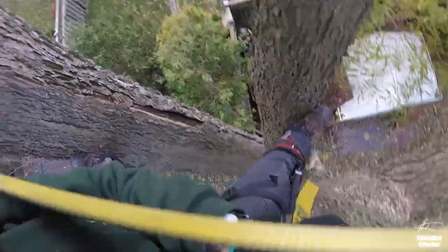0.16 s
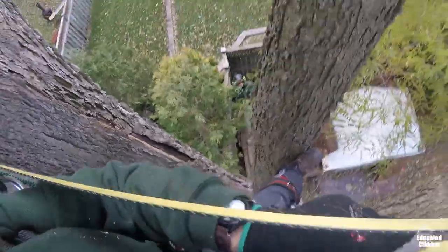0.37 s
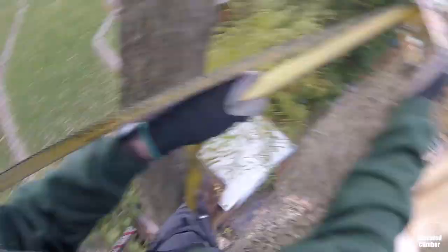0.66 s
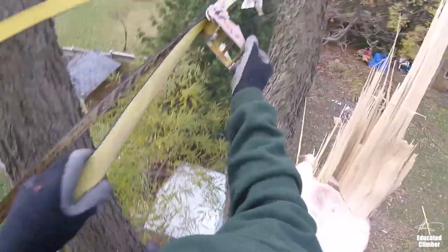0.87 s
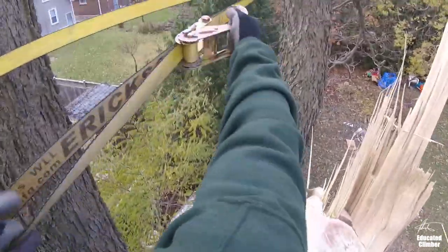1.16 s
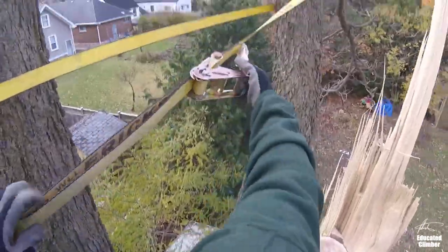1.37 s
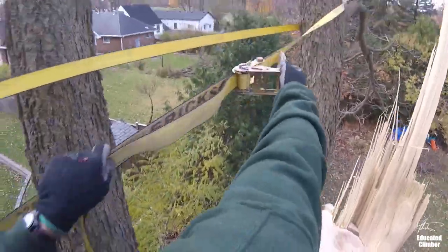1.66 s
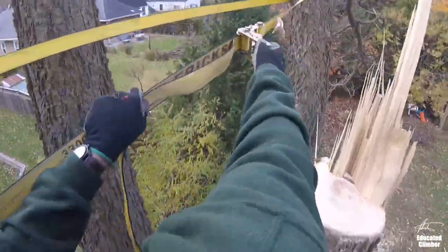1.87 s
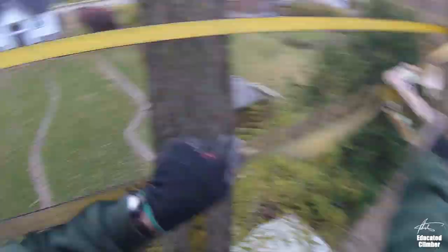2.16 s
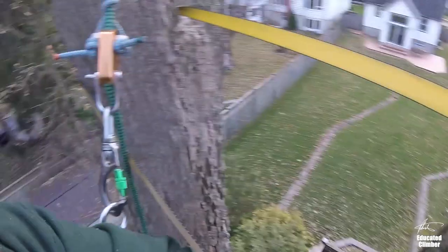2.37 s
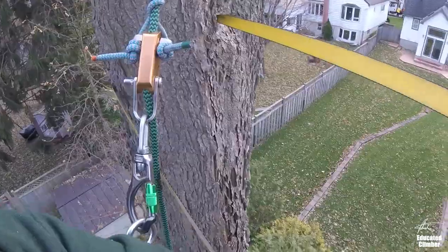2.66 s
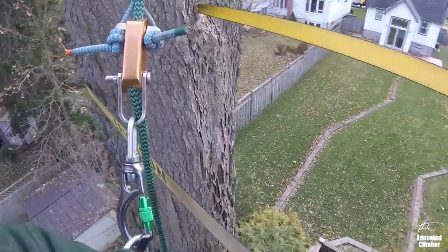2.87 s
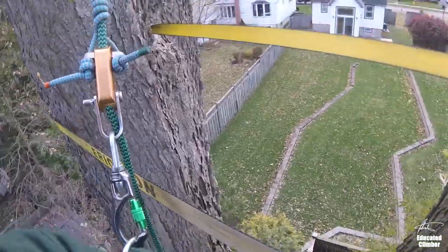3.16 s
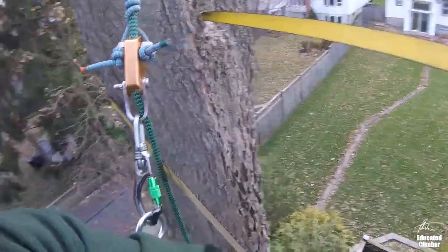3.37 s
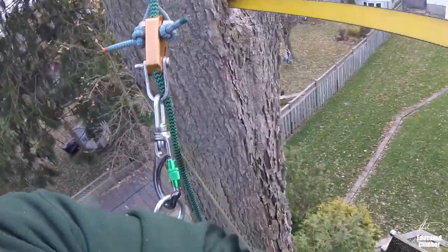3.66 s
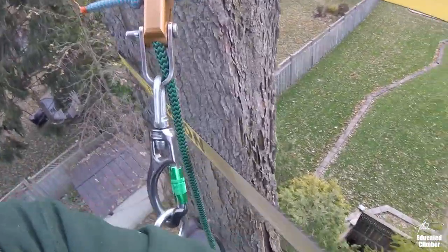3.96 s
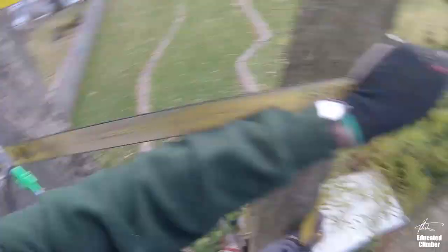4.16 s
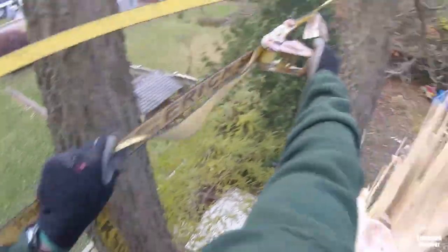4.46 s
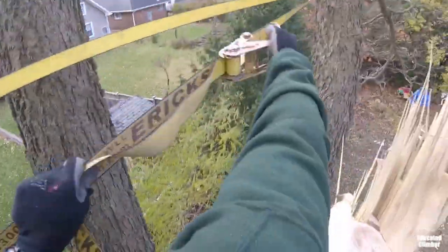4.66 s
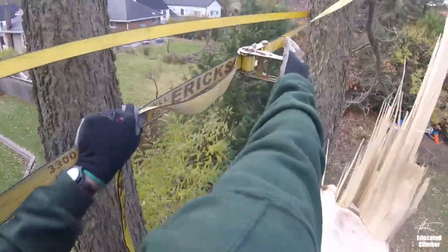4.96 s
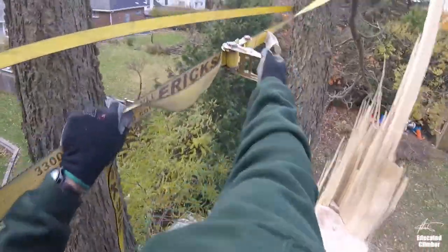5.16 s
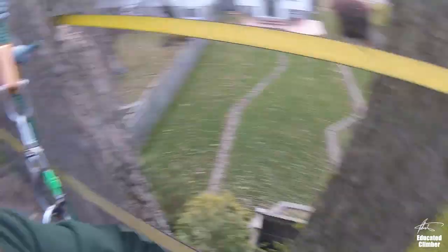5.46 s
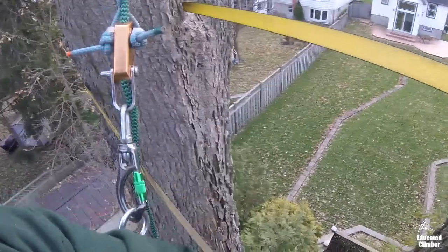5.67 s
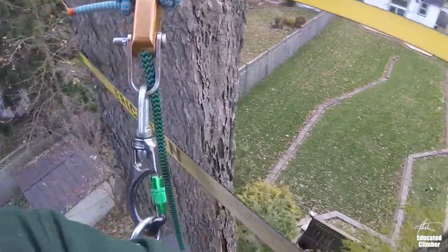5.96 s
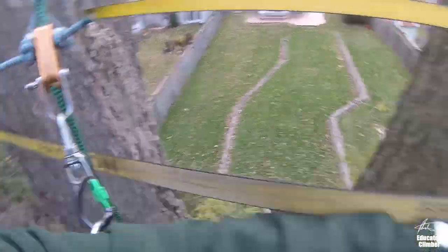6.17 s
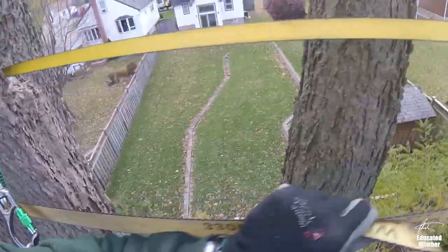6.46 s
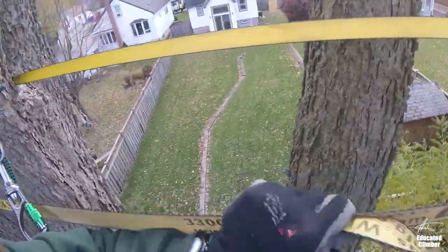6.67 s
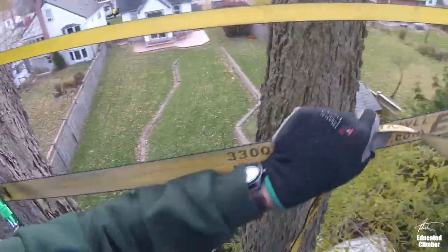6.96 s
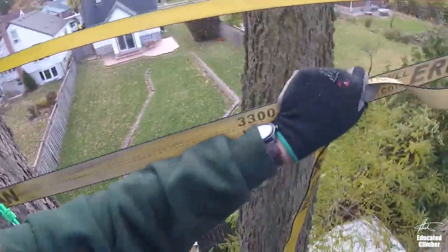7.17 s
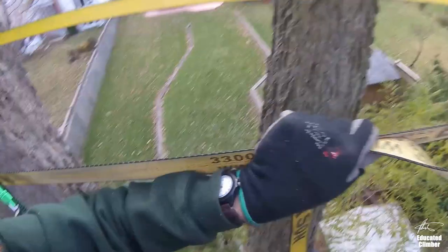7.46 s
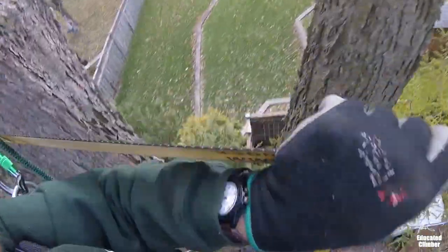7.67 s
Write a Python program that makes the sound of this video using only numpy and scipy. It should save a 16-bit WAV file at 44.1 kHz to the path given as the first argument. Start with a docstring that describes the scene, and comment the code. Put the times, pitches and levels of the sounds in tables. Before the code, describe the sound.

A hand-pumped metal ratchet cracks in singles and quick clusters, tightening a strap outdoors over soft air, hiss and a weak hum.

```python
"""High in a tree a steel ratchet is pumped to tighten a webbing strap between two trunks.
Bursts of tiny slips through dull, bright and steel resonances make the pawl snap and chatter. Edges of
high noise, handle tones, pulses along the taut strap and sliding, rustling noise complete the work.
Banded noise buffets the small camera microphone and gives the air of the suburb, over its steady hiss.
A far motor hums in a few wavering sine orders, and a bird gives a few thin, gliding sine whistles."""
import sys
import numpy as np
from scipy import signal
from scipy.fft import rfft, irfft
from scipy.io import wavfile

SR = 44100
rng = np.random.default_rng(int(sys.argv[2]) if len(sys.argv) > 2 else 0)


def transcribe(signal):
    """Save signal, clipped to [-1, 1], as a 16-bit WAV file at the path in sys.argv[1]."""
    frames = np.atleast_2d(signal).T
    limited = np.clip(frames, -1, 1)
    pcm = np.round(limited * 32767).astype(np.int16)
    wavfile.write(sys.argv[1], SR, pcm)


N = 345303   # length [samples]
GRAIN, LEAD = 4096, 700   # length of one contact, and its start within that [samples]
GRIP_DETUNE = 0.007   # grip and tension shift every tone a little from blow to blow: spread [ratio]

# ringing steel of the ratchet: (frequency [Hz], relative level [dB], t60 [s])
STEEL_MODES = [(1410, -24, .03), (2155, -3, 0.033), (2578, -3.5, 0.024), (3226, -9, 0.039),
               (3826, -2, 0.025), (4760, 1.5, 0.026), (5467, 4.5, 0.011), (6500, 4, 0.017),
               (6987, 2.5, 0.023), (8700, -11, 0.017), (9050, -12, .025), (10170, -20, 0.016),
               (11000, -28.5, 0.015)]
# broad crack of a contact, dull part: (frequency [Hz], width of one pass [Hz], relative level [dB])
DULL_CRACK = [(527, 1700, -12), (1354, 680, -5.5), (2136, 1000, -1.5), (3270, 2030, -1)]
# broad crack of a contact, bright part: (frequency [Hz], width of one pass [Hz], relative level [dB])
BRIGHT_CRACK = [(4932, 1500, 0.5), (6867, 1320, -0.5), (8300, 1900, -10), (9695, 1340, -12.5),
                (12000, 1900, -39), (13500, 700, -41)]


def amp(db):
    """Decibels to gain."""
    return 10 ** (np.asarray(db) / 20)


def rms_one(x):
    """Scale to unit power."""
    return x / np.sqrt(np.mean(np.abs(x) ** 2) + 1e-20)


def in_time(rows):
    """Columns of a curve, one value per sample."""
    s, *columns = np.transpose(rows)
    return [np.interp(np.arange(N) / SR, s, c) for c in columns]


def drift(rate):
    """Random wander of spread 1: noise through two equal poles at rate [Hz], made at SR / 40."""
    r = np.exp(-80 * np.pi * rate / SR)
    noise = rng.standard_normal(N // 40 + 2002)
    slow = signal.lfilter([1], [1, -2 * r, r * r], noise)[2000:]   # drop the settling
    return np.interp(np.arange(N) / 40, np.arange(len(slow)), rms_one(slow))


def resonance(hz, width_hz):
    """Complex response of a two-pole resonance over one grain, 1 at the top."""
    f = np.fft.rfftfreq(GRAIN, 1 / SR)
    return 1j * f * width_hz / (hz ** 2 - f ** 2 + 1j * f * width_hz)


def banded_noise(spectrum, patchy_db, rate):
    """Half-octave bands of noise, each with its own level and flicker; 0 dB per Hz is 1 rms in a kilohertz."""
    out, together = 0, drift(rate / 4)
    limits = 16 * 2 ** np.arange(0, 10.1, .5)
    white = rng.standard_normal((2, N))
    hz, db = np.transpose(spectrum)
    for k, (low, high) in enumerate(zip(limits, limits[1:])):
        if high < hz[0] or low > hz[-1]:
            continue
        band_filter = signal.butter(2, [low, high], "band", fs=SR, output="sos")
        band = signal.sosfilt(band_filter, white[k % 2])   # neighbours use different noise
        level_db = np.interp(np.log(low * high) / 2, np.log(hz), db, right=-90)
        flicker_db = patchy_db * (0.86 * together + drift(rate))
        out = out + band * amp(level_db + flicker_db)
    return out * np.sqrt(SR / 2000)


def wind():
    """Buffeting on the microphone: low banded noise that swells and sinks with the gusts."""
    # gusts: (time [s], relative level [dB])
    gusts = [(0.0, -48.5), (0.8, -51), (0.85, -40.5), (1.42, -67.5), (2.2, -38), (2.36, -37), (2.4, -56),
             (4.03, -50.5), (4.4, -44), (4.67, -61), (4.84, -45.5), (5.12, -52), (5.39, -43.5), (5.49, -57),
             (6.98, -50.5), (7.15, -43), (7.26, -55.5), (7.79, -46), (7.83, -57)]
    # colour of the buffeting: (frequency [Hz], relative density [dB per Hz])
    buffet = [(18, -4), (35, 1.5), (70, -2.5), (120, -10.5), (200, -21), (350, -35.5)]
    gust_db, = in_time(gusts)
    return amp(gust_db + 9.0) * banded_noise(buffet, patchy_db=3.5, rate=15.3)


def distant_air():
    """Air of the suburb: banded noise, weak on top, that shifts slowly."""
    # distant air: (time [s], relative level [dB])
    air_level = [(0.0, -59), (0.91, -58.5), (1.09, -66), (1.7, -64), (1.89, -62.5), (4.03, -59),
                 (4.23, -55.5), (4.84, -62), (7.83, -57.5)]
    # colour of the air: (frequency [Hz], relative density [dB per Hz])
    air_colour = [(30, 5), (90, 7), (250, 6), (500, -1), (900, -3), (2000, -13), (3500, -29), (5000, -39.5)]
    air_db, = in_time(air_level)
    return amp(air_db + 1.5) * banded_noise(air_colour, patchy_db=1.27, rate=1.8)


def hiss():
    """Smooth noise with the colour of the microphone port."""
    # steady hiss, shaped by the port: (frequency [Hz], relative density [dB per Hz])
    port = [(2500, -19.5), (6050, -16.5), (6500, 1), (7000, -7.5), (9500, -12), (10500, -23),
            (12300, -14.5), (13000, -38)]
    hz, db = np.transpose(port)
    even = N + N % 2
    colour = amp(np.interp(np.fft.rfftfreq(even, 1 / SR), hz, db))
    noise = irfft(rfft(rng.standard_normal(even)) * colour)[:N]
    return amp(-70) * rms_one(noise)


def motor():
    """A far motor: a few low orders that waver in pitch and level."""
    # course of the motor: (time [s], frequency of the first order [Hz], level [dB])
    course = [(0, 97.2, -60), (.5, 97.5, -51.5), (1.2, 96.3, -76), (2.6, 96.26, -62.5), (4.2, 96.2, -61),
              (7.83, 95.3, -62.5)]
    # its orders: (multiple, relative level [dB])
    orders = [(1, -2), (2, -4), (3, -14)]
    hz, db = in_time(course)
    phase = 2 * np.pi * np.cumsum(hz * (1 + 0.0059 * drift(2.75))) / SR
    out = 0
    for multiple, order_db in orders:
        level = amp(db + order_db + 2.35 * drift(3.4))
        out = out + np.sqrt(2) * level * np.sin(multiple * phase)
    return out


def rustle(rustle_db):
    """Rustle of webbing and sleeves: banded noise that flickers quickly and follows the work."""
    # colour of the rustle: (frequency [Hz], relative density [dB per Hz])
    cloth = [(220, 4.5), (500, 2), (900, -11.5), (2000, -1), (3500, -6.5), (5000, -4.5), (9000, -6)]
    return amp(rustle_db - 5.5) * banded_noise(cloth, patchy_db=4.5, rate=51.0)


def slip_burst(level_db, fade):
    """Tiny slips in millisecond clumps swell and die away, with a faint swell before and scatter after."""
    slips_per_s, clump_db = 2500, 4   # rate of the larger slips, spread of the clumps
    rise_db = 2   # fade that passes within one time constant of the rise [dB]
    lead_in_db, lead_in_db_per_ms = -22.5, 4
    scatter_db, scatter_ms = -33.5, 69   # relative level; time to fall 10 dB, before the taper
    ms, fade = (np.arange(GRAIN) - LEAD) / SR * 1000, max(fade, .6)
    slips = rng.standard_normal(GRAIN) * (0.69 + 1.53 * (rng.random(GRAIN) < slips_per_s / SR))
    slips *= amp(np.repeat(rng.normal(0, clump_db, GRAIN // 64), repeats=64))
    rise = 1 - np.exp(-np.abs(ms) * fade / rise_db)
    shape = np.where(ms > 0, rise * amp(-fade * ms), 0)
    # a faint noise swells in just before each burst, relatively stronger for louder ones
    swell_db = lead_in_db + 0.24 * (level_db + 14.0) + rng.normal(0, 3.3)
    shape += amp(swell_db - lead_in_db_per_ms * np.abs(ms))
    # the random slips keep the energy of their shape
    burst = slips * shape * np.sqrt(np.sum(shape ** 2) / np.sum((slips * shape) ** 2))
    # sound returned by trunks and branches
    scatter = rng.standard_normal(GRAIN) * amp(scatter_db - 10 * np.abs(ms) / scatter_ms)
    return burst + scatter * (ms > 2) * (1 - ms / ms[-1])


def contact(level_db, fade, dull_db, parts, modes):
    """A burst of slips heard as a broad crack plus the steel modes, struck anew each time."""
    dull_spread_db, bright_spread_db, mode_spread_db = 2.5, 3.5, 4
    ring_db = -2.5   # steel against the crack
    burst = slip_burst(level_db, fade)
    dull_hz, bright_hz, steel_hz = [np.array(t)[:, 0] for t in (DULL_CRACK, BRIGHT_CRACK, STEEL_MODES)]
    # past 6 dB of dullness, the duller the contact the more its weight sinks to the lowest resonances
    knock_db = max(dull_db - 6, 0)
    sink_db = knock_db * np.log2(dull_hz[-1] / np.maximum(dull_hz, dull_hz[1]))
    dull = rms_one(amp(sink_db + rng.normal(0, dull_spread_db, len(dull_hz))) @ parts[0])
    # a light touch is softer and loses the top
    soft_db = 0.63 * (level_db + 19.0) * np.log2(bright_hz / bright_hz[1])
    bright = rms_one(amp(soft_db + rng.normal(0, bright_spread_db, len(bright_hz))) @ parts[1])
    # the low modes follow the dull part
    mode_db = rng.normal(0, mode_spread_db, len(steel_hz)) + dull_db * (steel_hz < 4200)
    steel = amp(mode_db) @ modes
    bins = np.arange(len(steel))
    steel = np.interp(bins * (1 + GRIP_DETUNE * rng.normal()), bins, steel)
    share = amp(dull_db) / np.sqrt(1 + amp(2 * dull_db))
    crack = share * dull + np.sqrt(1 - share ** 2) * bright
    body = crack + amp(ring_db - knock_db) * rms_one(steel)
    return amp(level_db - 2.0) * irfft(rfft(burst) * body)


def ratchet(rustle_db):
    """Clicks on steel with their rebounds, and random faint ticks that follow the rustle of the work."""
    # clicks of pawl, handle and buckle: (time [s], relative level [dB], fade [dB per ms],
    # dull-to-bright balance [dB], rebound above the first touch [dB])
    clicks = [(.0085, -25, 3.5, -7, -17), (0.0526, -35, 2, -1, -16), (0.1467, -11, 1.47, -10, -9),
              (0.205, -25, 1, -4, -19), (0.2102, -11.5, 1.65, -10, -3), (0.3864, -35, 2, -10, -15),
              (0.405, -31.5, 1.5, -1, -15), (0.5213, -33, 2.5, -10, -22), (0.577, -42, 1.5, -2, -14),
              (.632, -42, 5, 1, -12), (0.656, -24, 5, -3, -20), (0.6612, -17.5, 1.5, -1.5, -7),
              (.668, -9, 4, -8, -5.5), (0.696, -31.5, 2.5, 9.5, -12), (0.726, -34, 0, -7, -2),
              (0.7426, -15, 2.5, -5, -22), (.757, -10, 2.5, -7, -29), (0.864, -39.5, 2.5, -3, -19),
              (0.9517, -42.5, 1, -4, -12), (.975, -39.5, 2.5, -2, 2.5), (1.0664, -14, 1.5, -16, -20),
              (1.0704, -9, 2, -19.5, -27), (1.1297, -18.5, 1, -13, 6.5), (1.324, -34, 0.5, -12, -21),
              (1.336, -28, 1.5, -9.5, -15), (1.363, -48.5, 2, 2, -12), (1.7138, -45, 1, -0.5, -2),
              (1.7825, -31.5, 1.5, 11, -15.5), (1.8029, -22.5, 3, 17, -16), (1.8099, -13, 5.5, -8.5, 3),
              (1.866, -31, 6, 6, 1.5), (1.8873, -13, 2.5, -5, -1), (2.0721, -28, 2, -14, -26),
              (2.2125, -36.5, 1, -8, -6), (2.33, -30, 0.5, -5, -21), (2.3356, -10.5, 1.95, -11.5, -11),
              (2.4165, -30, 0.5, -1, -18), (2.4227, -14, 3.5, -11, -3), (2.5851, -43, 0.9, -2, -12),
              (2.889, -30, 8.5, -4.5, -7.5), (2.9767, -29, 3, 9.5, -22), (3.003, -34, 3, -10, -12),
              (3.0113, -20.5, 1, -2.5, -20), (3.0202, -15, 5.5, 2.5, -11.5), (3.0497, -14.5, 17, -4, -22),
              (3.0541, -28.5, 2.5, 16, -8), (3.0885, -32, 3.5, 22, -9), (3.1375, -19, 3, -5, -22),
              (3.19, -46, 5, 3, -17), (3.22, -41, 6, 14, -15), (3.248, -42, 3, 18, -17),
              (3.2606, -35, 1, -1, -19), (3.2651, -21, 3.5, -8, -15), (3.317, -25, 2.5, 2, -13),
              (3.3408, -39, 2.5, 3, -8), (3.3893, -42, 2.5, -4, -11), (3.4156, -42, 2, 5, -12),
              (3.5355, -24.5, 1.5, -4.5, 4), (3.5436, -15.5, 1.7, -6, -8), (3.76, -30.5, 1.2, -1.5, -16),
              (3.979, -44.5, 1.5, -7, -10), (3.9924, -41.5, 3.5, 0, -4), (4.0397, -37.5, 5, 7.5, -13),
              (4.069, -33.5, 3.5, -5, 5), (4.08, -16, 4.5, -5.5, -21), (4.088, -11.5, 2, -5, -9),
              (4.185, -43, 0.5, -7, -12), (4.291, -39.5, 1.5, -8, -8), (4.3278, -16, 2.5, -12, -23),
              (4.378, -26, 1.1, -7, 1.5), (4.4324, -31.5, 9, -9, -11), (4.455, -39.5, 1, -4.5, 4),
              (4.552, -24, 3.5, 12.5, -13), (4.579, -20.5, 1.5, -6, -18), (4.582, -11, 2, -20, -31),
              (4.59, -11.5, 1.5, -12, -6), (4.7724, -32, 0.9, -7.5, -18), (4.7906, -26.5, 3.5, -3.5, -11.5),
              (4.873, -39.5, 2.5, -2, -14), (4.9159, -38, 13, -3.5, 1.5), (5.023, -37.5, 4, -6, 5),
              (5.0402, -18, 2, -9, -22), (5.0503, -10, 3, -9, -34), (5.09, -32, 8, 12, -19),
              (5.1082, -36.5, 1.5, 19, -7), (5.144, -36, 1.5, 11.5, -11), (5.2952, -32, 1.5, -4.5, -22),
              (5.384, -37, 9, -12, -17), (5.404, -44, 2.5, -5, -12), (5.4155, -39, 2.5, -8, -17),
              (5.4364, -36.5, 2.5, 7, -10), (5.53, -20, 4, -3, -22), (5.5322, -10, 3.5, -9, -2.5),
              (5.7369, -25.5, 7, 0, 1), (5.8787, -36.5, 2, 36, -7), (6.059, -30, 2, -12, -17),
              (6.0749, -19.5, 2, -8.5, -22), (6.0876, -13.5, 2.5, -5, -7), (6.156, -36.5, 4.5, 12, -10),
              (6.204, -40.5, 5, -13, -10), (6.3385, -34.5, 2, -2.5, -16), (6.3793, -42, 4, -1, -16),
              (6.4401, -39.5, 7, -6, 1), (6.4643, -36, 2, 14.5, -12), (6.5564, -32.5, 2, -2, -23),
              (6.5685, -20.5, 2, -10, -20), (6.573, -7, 3, -8, -4.5), (6.7867, -36.5, 0, -8, 6.5),
              (6.8047, -27.5, 3.5, -6.5, -27), (6.9055, -42, 1.5, -1, -14), (7.022, -45.5, 1.5, -9, -10),
              (7.111, -36, 8, -10, -5), (7.1267, -12.5, 5.5, 10, -18), (7.137, -24.5, 0, -3, 5),
              (7.1543, -10, 3, -4.5, -12), (7.269, -38, 7, -12, -20), (7.3801, -30.5, 2.2, -3, 3.5),
              (7.7819, -20, 3.5, 9.5, -5)]
    # the pawl lands again: delay [s], fade [dB per ms], change of balance [dB]
    rebound_s, rebound_fade, rebound_dull_db = .0066, 3.2, -3.5
    # faint rattle of loose hardware: rate, base level against the rustle, spread
    ticks_per_s, tick_db, tick_spread_db = 85, 6.5, 3.5
    parts = [np.array([(-1) ** k * amp(db) * resonance(hz, width) ** 2
                       for k, (hz, width, db) in enumerate(part)])
             for part in (DULL_CRACK, BRIGHT_CRACK)]
    modes = np.array([(-1) ** k * amp(db) * np.sqrt(t60) * resonance(hz, np.log(1000) / np.pi / t60)
                      for k, (hz, db, t60) in enumerate(STEEL_MODES)])
    touches = []
    for when, size, fading, tone in rng.random((round(ticks_per_s * N / SR), 4)):
        level_db = rustle_db[int(when * N)] + tick_db - tick_spread_db * np.log(size + .02)
        touches.append((when * N / SR, level_db, 4.0 + 6 * fading, -8 + 16 * tone))
    for s, level_db, fade, dull_db, rebound_db in clicks:
        touches.append((s, level_db, fade, dull_db))
        touches.append((s + rebound_s, level_db + rebound_db, rebound_fade, dull_db + rebound_dull_db))
    out = np.zeros(N + GRAIN)
    for s, level_db, fade, dull_db in touches:
        at = round(s * SR)
        out[at:at + GRAIN] += contact(level_db, fade, dull_db, parts, modes)
    return out[LEAD + 35:LEAD + 35 + N]   # each burst starts 35 samples ahead of its listed time


def high_edges():
    """Brief puffs of very high resonant noise on the hardest snaps."""
    # the hardest snaps carry a thin, very high edge: (time [s], level [dB])
    snaps = [(0.148, -30), (0.6674, -33.5), (1.1343, -36.5), (2.3361, -32.5), (4.578, -43), (5.5306, -30.5),
             (6.573, -25.5)]
    edge_hz, width_hz, fade_ms = 11630, 1300, 4.4   # width of one pass; time to fall 10 dB
    out, ms = np.zeros(N + GRAIN), np.arange(GRAIN) / SR * 1000
    for s, db in snaps:
        puff = irfft(rfft(rng.standard_normal(GRAIN)) * resonance(edge_hz, width_hz) ** 2)
        shape = amp(db - 10 * ms / fade_ms) * np.minimum(ms, 1)
        out[round(s * SR):][:GRAIN] += rms_one(puff) * shape
    return out[:N]


def handle():
    """Blows set the handle ringing: two lingering tones, a little off pitch and unsteady each time."""
    # blows: (time [s], level of the lower tone [dB], level of the upper tone [dB])
    blows = [(0.974, -44.5, -50), (1.072, -48, -38.5), (4.089, -47, -28.5), (4.329, -50, -41),
             (5.052, -30, -37), (6.089, -33.5, -43), (7.026, -68, -53), (7.157, -34.5, -34)]
    # its two tones: (frequency [Hz], t60 [s])
    tones = [(3270, .06), (4730, 0.086)]
    out, t = np.zeros(N + SR), np.arange(SR // 4) / SR
    for s, *levels_db in blows:
        for (hz, t60), db in zip(tones, levels_db):
            turns = hz * (1 + GRIP_DETUNE * rng.normal()) * t
            shape = amp(db - 60 * t / t60) * np.minimum(t / 0.0017, 1)
            out[round(s * SR):][:len(t)] += shape * np.sin(2 * np.pi * turns)
    return out[:N] * amp(4.8 * drift(90.0))


def strap():
    """A pluck runs to and fro along the webbing: a pulse rounder once returned, weaker on every trip."""
    # plucks of the taut strap: (time [s], round trips [Hz], relative level [dB], t60 [s],
    # edge of the first pulse [Hz])
    plucks = [(1.8084, 57.9, -16.5, 0.24, 337), (3.068, 61.5, -25, 0.14, 467),
              (4.552, 61.4, -24.5, 0.047, 1200), (5.878, 59.5, -32.5, 0.043, 1490),
              (7.125, 68.6, -23.5, 0.3, 445)]
    low_cut_hz, trip_loss_hz = 164, 240
    out, near = np.full(N, 1e-18), np.arange(-400, 400)
    for s, hz, db, t60, edge_hz in plucks:
        for trip in range(20):
            rounding = min(trip, 1) / trip_loss_hz ** 2
            width = SR / (2 * np.pi) * np.sqrt(1 / edge_hz ** 2 + rounding)
            pulse = np.exp(-.5 * (near / width) ** 2)
            out[round((s + trip / hz) * SR) + near] += amp(db - 60 * trip / hz / t60) * pulse
    return signal.sosfilt(signal.butter(2, low_cut_hz, "high", fs=SR, output="sos"), out)


def bird():
    """Thin, nearly pure whistles that swell and stop, sliding to a held pitch where they open off it."""
    # bird calls: (time [s], length [s], opening pitch [Hz], held pitch [Hz], relative level [dB])
    calls = [(3.785, 0.1, 7850, 8000, -70), (3.901, 0.088, 6540, 7560, -65), (4.1, .06, 7500, 7500, -65)]
    glide_s, flutter_db, waver_hz = 0.014, 2.5, 40
    out = np.zeros(N)
    for s, length, open_hz, held_hz, db in calls:
        t = np.arange(round(length * SR)) / SR
        glide_hz = (open_hz - held_hz) * np.exp(-t / glide_s)
        hz = held_hz + glide_hz + waver_hz * drift(80.0)[:len(t)]
        swell = np.sqrt(2) * amp(db) * np.sin(np.pi * t / length) ** .4
        out[round(s * SR):][:len(t)] += swell * np.sin(2 * np.pi * np.cumsum(hz) / SR)
    return out * amp(flutter_db * drift(90.0))


def slide():
    """Webbing slides on after a pluck: noise in a broad resonance that starts at once and fades."""
    # slides: (time [s], level [dB], t60 [s])
    slides = [(7.16, -54, 1.07)]
    slide_hz, width_hz = 2080, 1500   # width of one pass
    out = np.zeros(N)
    band = signal.iirpeak(slide_hz, slide_hz / width_hz, SR)
    once = signal.lfilter(*band, rng.standard_normal(N))
    noise = rms_one(signal.lfilter(*band, once))
    for s, db, t60 in slides:
        t = np.arange(N) / SR - s
        out += (t > 0) * amp(db - 60 * np.abs(t) / t60)
    return out * noise * amp(3.5 * drift(40.0))


def scene():
    """Ratchet and strap close by, weather and neighbourhood behind."""
    # rustle of webbing and sleeves: (time [s], relative level [dB])
    work = [(0.0, -57), (0.44, -75), (0.74, -62.5), (1.16, -68.5), (1.42, -86), (1.74, -80), (1.89, -71),
            (2.63, -69), (2.68, -84.5), (2.87, -78), (2.94, -70), (3.12, -55.5), (3.23, -63), (3.79, -69.5),
            (4.03, -70), (4.21, -65), (4.47, -62), (4.8, -71.5), (5.26, -66), (5.93, -69), (6.32, -67),
            (6.91, -66.5), (7.28, -63.5), (7.5, -69), (7.83, -76.5)]
    rustle_db, = in_time(work)
    behind = wind() + distant_air() + motor() + bird()
    steel = ratchet(rustle_db) + high_edges() + handle()
    webbing = rustle(rustle_db) + strap() + slide()
    return (behind + steel + webbing)[None]


def record(dry):
    """The housing lifts a narrow band, the microphone adds its hiss, peaks are rounded and the top is cut."""
    # cavity in front of the microphone: (frequency [Hz], width [Hz], boost [dB])
    housing = [(6800, 190, 3)]
    for hz, width_hz, db in housing:
        dry = dry + (amp(db) - 1) * signal.lfilter(*signal.iirpeak(hz, hz / width_hz, SR), dry)
    rounded = 0.59 * np.tanh((dry + hiss()) / 0.6)
    top_cut = signal.cheby2(12, 70, 15500, fs=SR, output="sos")   # 70 dB down from 15500 Hz
    return signal.sosfilt(top_cut, rounded)


dry = scene()
out = record(dry)
transcribe(out)
```